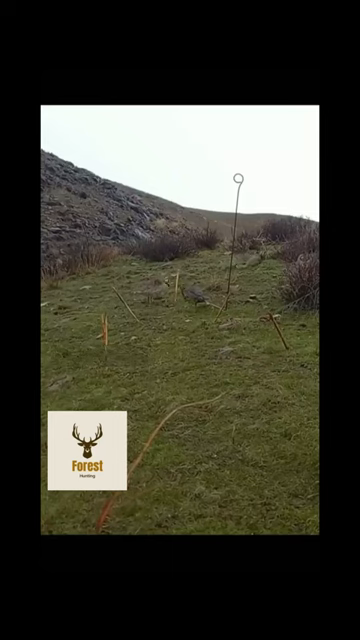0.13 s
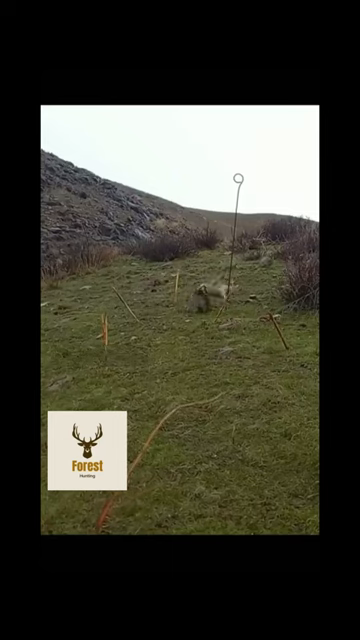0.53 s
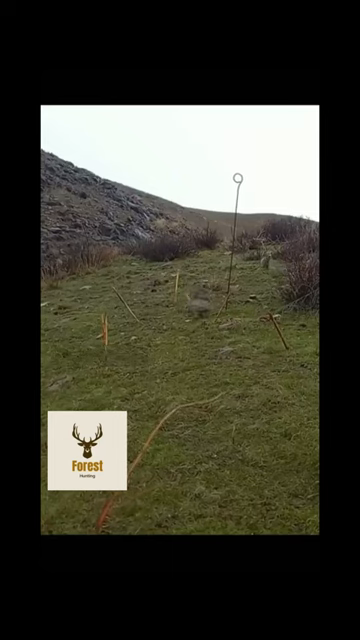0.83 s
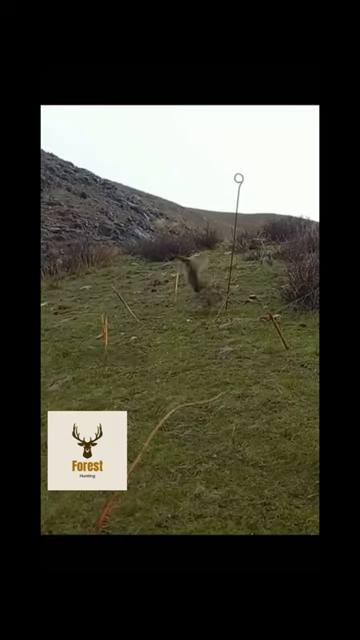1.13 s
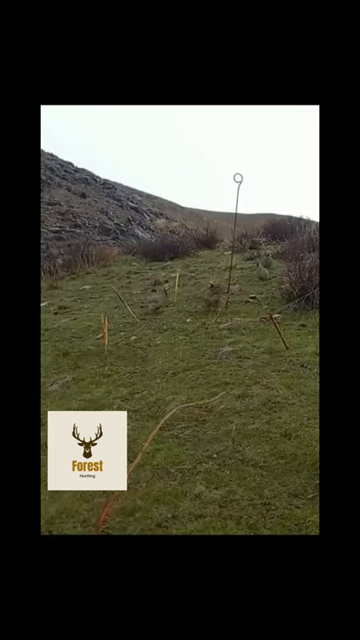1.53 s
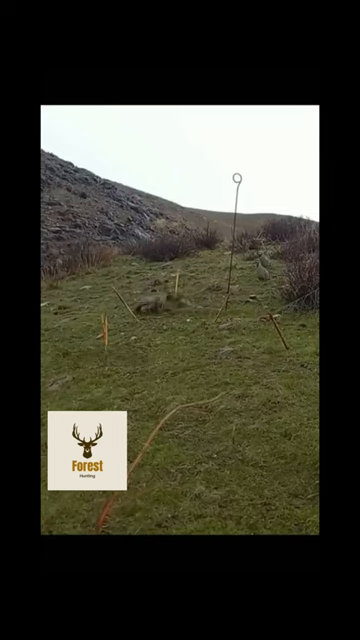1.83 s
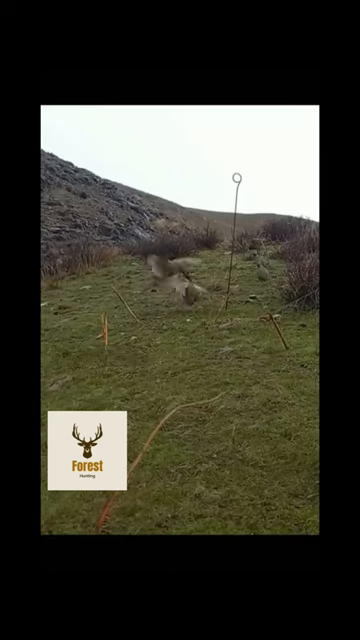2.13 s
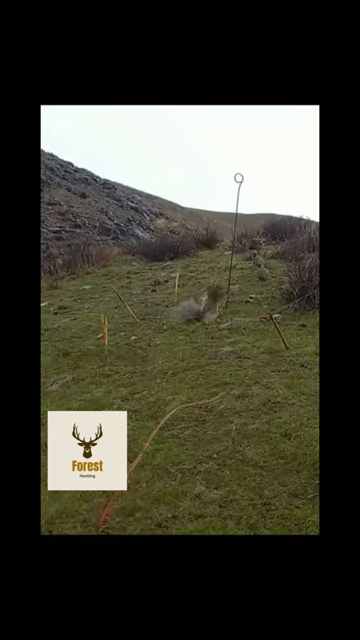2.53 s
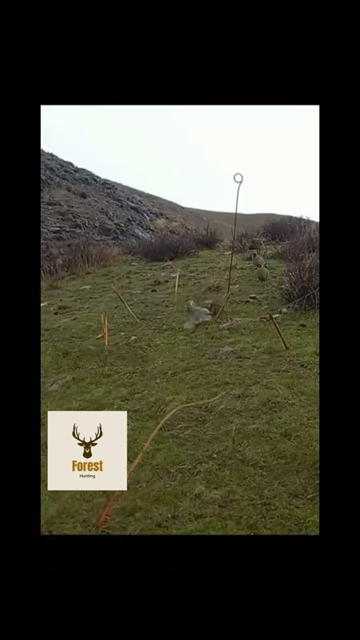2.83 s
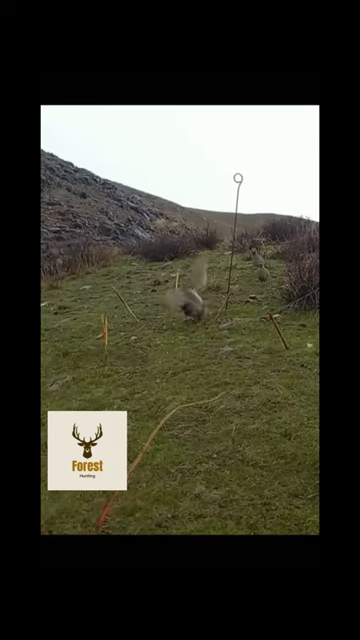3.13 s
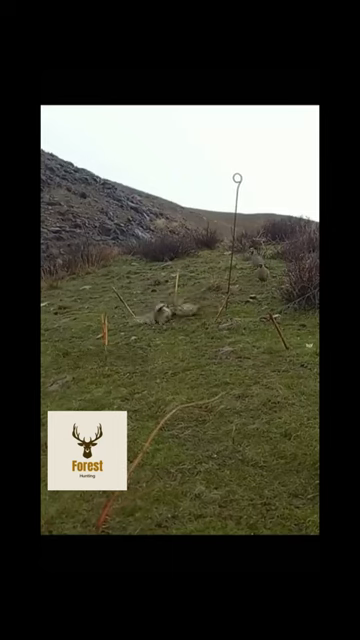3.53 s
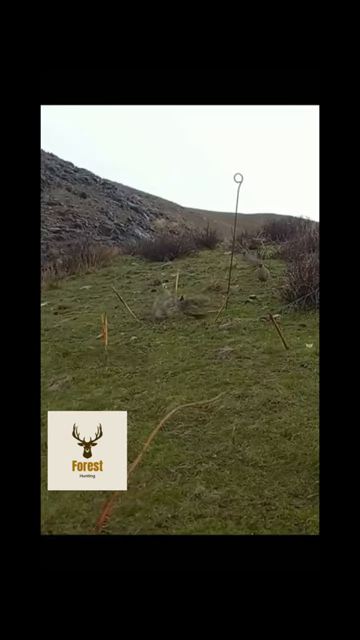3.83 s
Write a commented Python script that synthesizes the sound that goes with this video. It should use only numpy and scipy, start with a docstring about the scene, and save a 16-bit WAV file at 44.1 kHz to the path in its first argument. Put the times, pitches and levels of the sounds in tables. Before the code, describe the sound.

Fighting birds growl, hiss and squeal close by while their wings slap and feathers rustle.

```python
"""On a grassy hillside, two partridges fight close by, after a moment of silence. They growl and hiss, and
their hoarse calls break upward into thin squeals. A growl is a train of uneven pulses ringing in the throat and
mouth; a hiss is air forced through the beak. Three times they clash, once only briefly, in a flurry of wing
blows and rustling feathers. Moving air rumbles on the microphone, and the quiet field murmurs behind it all."""
import sys
import numpy as np
from scipy import signal
from scipy.fft import rfft, irfft
from scipy.io import wavfile
from scipy.ndimage import uniform_filter1d

SR = 44100
rng = np.random.default_rng(int(sys.argv[2]) if len(sys.argv) > 2 else 0)


def bounce(signal):
    """Save signal as a 16-bit WAV file at the path given by the first command-line argument."""
    frames = np.transpose(np.atleast_2d(signal))
    limited = np.clip(frames, -1, 1)
    pcm = np.round(limited * 32767).astype(np.int16)
    wavfile.write(sys.argv[1], SR, pcm)


N = 176400  # 4 seconds

# Tone colours: how strong the lows and highs of each sound are (frequency [Hz], relative level [dB])
FIELD_COLOUR = [(700, 11), (5500, 0.5), (15000, -17)]
RUMBLE_COLOUR = [(28, -23.5), (70, 6.5), (240, -40.5)]
BUFFET_COLOUR = [(60, 0), (140, -2.5), (750, -9.5), (4000, -45)]  # air shoved by a wing
FEATHER_COLOUR = [(400, 0), (1200, -0.5), (4500, 3.5), (8000, -4), (13000, -4.5), (15500, -64)]
SLAP_COLOUR = [(300, -1.5), (1200, 7), (4000, 3), (12000, -24.5)]
HISS_COLOUR = [(2000, -13), (4500, 8.5), (8500, -23)]
BODY_COLOUR = [(330, -29), (540, -10.5), (850, -9.5), (2000, -25.5), (3300, -70)]  # the low part of the voice
TREBLE_COLOUR = [(1300, -18), (2300, 5), (4600, 4), (5800, -10.5), (8500, -35), (12000, -19.5),
                 (15000, -50)]  # the high part of the voice

# Puffs of air from the wings (time [s], level [dB])
PUFFS = [(1.867, -18.5), (2.104, -13.5), (2.43, -10.5), (3.268, -16), (3.806, -19)]
# Scuffles, one list of points each (time [s], buffeting level [dB], rustle level [dB])
SCUFFLES = [
    [(.6, -29, -34), (.68, -40, -38)],
    [(2.255, -32, -38), (2.34, -22.5, -33), (2.5, -20, -28), (2.72, -22, -36), (2.75, -38, -33)],
    [(3.37, -47, -33.5), (3.42, -19, -23), (3.63, -16.5, -29.5), (3.745, -29.5, -36.5)],
]
# Wing blows and pecks (time [s], thud level [dB], slap level [dB])
BLOWS = [(0.291, -67, -21.5), (1.307, -15, -59), (2.366, -8.5, -23), (2.391, -13.5, -15), (2.67, -5, -13.5),
         (3.491, -12.5, -14), (3.585, -13.5, -12)]
# Feather snaps (time [s], level [dB])
SNAPS = [(2.534, -24.5), (2.602, -23), (3.409, -14.5), (3.476, -25), (3.55, -37), (3.735, -23.5)]
# Hoarse hisses (time [s], length [s], level [dB])
HISSES = [(0.146, 0.17, -28.5), (0.881, 0.14, -36), (1.275, 0.18, -33.5), (1.654, 0.21, -26.5),
          (1.984, 0.062, -30.5), (2.045, 0.2, -29), (3.914, 0.078, -28.5)]
# Squeals, one list of points each (time [s], pitch [Hz])
SQUEALS = [
    [(2.058, 2460), (2.077, 3085), (2.081, 4910), (2.09, 2440), (2.103, 3120)],
    [(2.44, 3000), (2.443, 5000), (2.449, 5050), (2.454, 2670), (2.466, 3190), (2.469, 4960), (2.475, 4990),
     (2.479, 2540)],
    [(2.833, 2695), (2.848, 3110), (2.851, 4810), (2.879, 5070), (2.889, 4620), (2.894, 2650),
     (2.908, 2960)],
    [(3.212, 2845), (3.227, 3265), (3.231, 4946), (3.269, 5085), (3.281, 4550), (3.293, 5060), (3.3, 2650)],
    [(3.639, 4834), (3.644, 3033), (3.659, 2864), (3.662, 5020), (3.668, 4750), (3.672, 2600)],
]
# How loud each squeal is at its top pitch (level [dB])
SQUEAL_LEVELS = [-20, -15.5, -15, -13, -11]
# Hoarse calls, one list of points each
# (time [s], pitch before any jump to a shriek [Hz], level [dB], treble over body [dB], roughness [0-1])
GROWLS = [
    [(0.153, 629, -26, -5.5, 0.25), (0.172, 599, -27, -20, 0.55), (0.212, 872, -28, -13, 0.43),
     (0.248, 815, -17, -3.5, 0), (0.272, 795, -18, -0.5, 0.25)],
    [(0.375, 471, -42, -35, 0.36), (0.396, 565, -21.5, -46, 0.26)],
    [(0.462, 749, -36.5, -12, 0.33), (0.515, 791, -23.5, 4, 0.47), (0.547, 494, -22.5, -11.5, 0.54)],
    [(0.603, 610, -33.5, -26, 0.42), (0.625, 465, -32, -19, 0.7)],
    [(0.695, 608, -35, -11, 0.32), (0.722, 582, -17, -0.5, 0.17), (0.731, 1659, -11, 14, 0.36),
     (0.746, 2117, -10, 12.5, 0.43), (0.766, 598, -16, 3.5, 0.93), (0.792, 408, -26.5, -4, 0.26)],
    [(0.917, 853.5, -37, -17, 0.39), (0.968, 1029, -20.5, 89, 0.02), (1.01, 1048, -35, 2, 0.48),
     (1.064, 539, -20, -12, 0.51)],
    [(1.15, 617, -30, 0, 0.29), (1.178, 1376, -18, 10, 0.38), (1.197, 1947, -8.5, 9.5, 0.36),
     (1.21, 679, -17, 17, 0.78), (1.232, 580, -26.5, -0.5, 0.03)],
    [(1.322, 394, -27.5, -31, 0.15), (1.342, 441, -19, -37, 0.6)],
    [(1.418, 698, -32.5, 1.5, 0.5), (1.492, 560, -22, -4.5, 0.68), (1.512, 1660, -14, 3, 0.18),
     (1.54, 2318, -12.5, 12.5, 0.57), (1.556, 726, -25.5, 9, 0.52), (1.589, 608, -24, -1.5, 0.3)],
    [(1.73, 686, -26.5, -4, 0.82), (1.812, 671.4, -21, -6.5, 0.13), (1.84, 711, -17.5, -0.5, 0.25)],
    [(2.115, 663.3, -22.5, 9, 0.9), (2.15, 473, -21, -10, 0.7)],
    [(2.433, 1856, -15, 4.5, 0.57), (2.485, 896, -14.5, 9, 0.57), (2.506, 783, -18, -5.5, 0.03)],
    [(2.912, 820, -20.5, 17, 0.75), (2.936, 646, -24, 0, 0.28)],
    [(3.05, 603, -37.5, 13.5, 0.2), (3.1, 633, -27.5, -7, 0.24)],
    [(3.3, 983, -21.5, 5, 0.63), (3.323, 590, -22.5, 0, 0.39)],
    [(3.617, 893, -20, 0, 0.49), (3.633, 1821, -13, 17, 0.49), (3.674, 1320, -14.5, 17, 0.5),
     (3.704, 675, -19.5, -5.5, 0.34)],
]

SILENCE_S, TOP_HZ = .15, 15900  # the opening silence; the upper edge of the sound


def amp(db):
    """Turns decibels into a number to multiply a sound by."""
    return 10 ** (np.asarray(db) / 20)


def unit(x):
    """Scales a sound so its average strength (rms) is 1."""
    return x / np.sqrt(np.mean(x ** 2) + 1e-20)


def steady(x):
    """Evens out the level over about a hundredth of a second."""
    return x / np.sqrt(abs(uniform_filter1d(x * x, size=500)) + 1e-12)


def colour(x, points):
    """Filters a sound to give it a tone colour."""
    hz, db = np.transpose(points)
    grid_hz = np.fft.rfftfreq(8192, 1 / SR)
    log_gain = np.interp(np.log(grid_hz + 1), np.log(hz), db) * np.log(10) / 20
    cepstrum = irfft(log_gain)
    cepstrum[1:4096] *= 2  # folded so the filter rings after a sound, never before it
    cepstrum[4097:] = 0
    ring = irfft(np.exp(rfft(cepstrum)))
    return signal.fftconvolve(x, ring)[:len(x)]


def noise(n, points):
    """Makes n samples of noise with a tone colour."""
    return colour(rng.standard_normal(n), points)


def wander(n, hz):
    """A smooth random wobble of strength 1, moving at rates up to about hz."""
    padded = n + SR // 4
    rolloff = 1 + (np.fft.rfftfreq(padded, 1 / SR) / hz) ** 4
    return unit(irfft(rfft(rng.standard_normal(padded)) / rolloff))[:n]


def swell(t, peak_s):
    """Rises to 1 at peak_s, then dies away."""
    return t / peak_s * np.exp(1 - t / peak_s)


def gesture(rows, attack_s=.012, release_s=.0058):
    """Joins points into a start time, a fade in and out, and one curve for each column after time."""
    times, *columns = np.transpose(sorted(rows))
    t = np.arange(times[0] - attack_s, times[-1] + release_s, 1 / SR)
    fade = np.interp(t, [t[0], times[0], times[-1], t[-1]], [0, 1, 1, 0])
    return t[0], fade, [np.interp(t, times, column) for column in columns]


def track(source, table):
    """Plays every row of a table and mixes each sound in at its start time."""
    mix = np.zeros(N)
    for row in table:
        start, sound = source(*row)
        part = mix[max(round(start * SR), 0):][:len(sound)]
        part += sound[:len(part)]
    return mix


def field(db=-43, waver_db=3):
    """The quiet field: a soft rush whose level wavers."""
    return amp(db) * unit(noise(N, FIELD_COLOUR) * amp(waver_db * wander(N, 9)))


def rumble(db=-36):
    """Air rumbles low on the microphone."""
    return amp(db) * unit(noise(N, RUMBLE_COLOUR))


def puff(start, db, pitch_hz=69.4):
    """Air from a wing reaches the microphone as a soft, low thump."""
    t = np.arange(0, .25, 1 / SR)
    phase = 2 * np.pi * np.cumsum(pitch_hz * (1 + .353 * wander(len(t), 61))) / SR
    return start, amp(db) * np.sin(phase) * swell(t, peak_s=.025)


def scuffle(rows, stroke_db=4.5, crackle_db=4.5):
    """Wings buffet the air in lumps while feathers rustle and grass crackles."""
    start, fade, (buffet_db, rustle_db) = gesture(rows)
    n = len(fade)
    strokes = amp(stroke_db * wander(n, 45))
    crackle = rng.standard_normal(n) * amp(crackle_db * wander(n, 1100))
    rustle = colour(crackle * strokes, FEATHER_COLOUR)
    buffet = colour(rng.standard_normal(n) * strokes, BUFFET_COLOUR)
    return start, fade * (amp(buffet_db) * unit(buffet) + amp(rustle_db) * unit(rustle))


def blow(start, thud_db, slap_db):
    """A wing strikes: a dull push of air and a short slap."""
    t = np.arange(0, .04, 1 / SR)
    thud = unit(noise(len(t), BUFFET_COLOUR)) * swell(t, peak_s=.0026)
    slap = steady(noise(len(t), SLAP_COLOUR)) * swell(t, peak_s=.0019)
    return start, amp(thud_db) * thud + amp(slap_db) * slap


def snap(start, db, decay_s=.006):
    """Stiff feathers flick past each other: a sudden, bright burst."""
    t = np.arange(0, 10 * decay_s, 1 / SR)
    return start, amp(db) * unit(noise(len(t), FEATHER_COLOUR)) * np.exp(-t / decay_s)


def hiss(start, length, db, whistle_hz=(3890, 5140)):
    """Air forced through the beak, with two wandering whistles in it."""
    n = int(length * SR)
    whistles = np.zeros(n)
    for hz in whistle_hz:
        phase = 2 * np.pi * np.cumsum(hz * (1 + .16 * wander(n, 57.6))) / SR
        whistles += np.sin(phase) * wander(n, 126)
    air = unit(noise(n, HISS_COLOUR)) + .96 * unit(whistles)
    fade = np.sin(np.pi * np.arange(n) / n) ** .69
    return start, amp(db) * unit(air) * fade


def squeal_gesture(rows):
    """The start time, very quick fades and pitch curve of one squeal."""
    return gesture(rows, attack_s=.003, release_s=.003)


def squeal(rows, db, waver=.016, rasp=.28, overtone_db=-14, breath_db=-17):
    """A raspy tone that jumps between two pitch ranges; the low one is weaker and has an overtone."""
    start, fade, (hz,) = squeal_gesture(rows)
    n = len(hz)
    phase = 2 * np.pi * np.cumsum(hz * (1 + waver * wander(n, 530))) / SR
    lowness = np.clip((3700 - hz) / 700, 0, 1)
    tone = np.sin(phase) + amp(overtone_db) * lowness * np.sin(2 * phase)
    flutter = 1 + rasp * (wander(n, 90) + .5 * wander(n, 900))
    tone *= np.sqrt(2) * (hz / hz.max()) * flutter
    breath = amp(breath_db) * unit(noise(n, TREBLE_COLOUR))
    build_up = np.minimum(np.linspace(.35, 2, n), 1)
    return start, fade * amp(db) * (tone + breath) * build_up


def throat(x, ring_s=.001):
    """A brief ringing in the throat that shifts from one random colour to another during a call."""
    t = np.arange(0, 10 * ring_s, 1 / SR)
    angle = np.linspace(0, np.pi, len(x))
    ringing = np.zeros(len(x))
    for blend in (np.cos(angle), np.sin(angle)):
        ring = rng.standard_normal(len(t)) * np.exp(-t / ring_s)
        ringing += blend * signal.fftconvolve(x, ring)[:len(x)]
    return ringing


def mouth(x, pitch_hz, highest_hz=2150):
    """The mouth opens and closes with the pitch, ringing at nearly twice that pitch, up to a limit."""
    ring_hz = np.minimum(1.95 * pitch_hz, highest_hz)
    spin = np.exp(2j * np.pi * np.cumsum(ring_hz) / SR)
    decay = np.exp(-np.pi * 1200 / SR)
    # Slide ring_hz down to zero, smooth twice, then slide back: only a band around it is left.
    smoothed = signal.lfilter([1 - decay], [1, -2 * decay, decay ** 2], x / spin)
    return (spin * smoothed).real


def growl(rows, crack=.24, jitter=.1533, shimmer=.32):
    """Unsteady pulses and puffs of breath make the throat and the moving mouth ring."""
    start, fade, (hz, db, treble_db, rough) = gesture(rows)
    n = len(hz)
    cracks = crack * rough * np.sign(wander(n, 130))  # the voice cracks up and down
    held_hz = np.select([hz > 2000, hz > 1217], [2600, 1672], hz)  # a pushed voice jumps to a shriek
    wobble = jitter * rough * wander(n, 393)
    phase = 2 * np.pi * np.cumsum(held_hz * (1 + wobble + cracks)) / SR
    pulses = unit(sum(np.cos(k * phase) * (k * hz < TOP_HZ) for k in range(1, 24)))
    pulses = steady(pulses) * (1 + shimmer * rough * wander(n, 500))
    breath = rough * unit((1 + np.cos(phase)) * rng.standard_normal(n))  # one puff with each pulse
    buzz = pulses + breath
    body = steady(colour(buzz, BODY_COLOUR))
    body = steady(body + 1.2 * steady(mouth(body, hz)))
    treble = steady(colour(throat(buzz), TREBLE_COLOUR))
    voice = (body + amp(treble_db) * treble) / np.sqrt(1 + amp(treble_db) ** 2)
    return start, fade * amp(db) * voice


def scene():
    """Mixes voices, wings, rumbling air and the field; a growl gives way while the voice squeals."""
    squealing = track(lambda rows: squeal_gesture(rows)[:2], zip(SQUEALS))  # 1 during a squeal
    growls = track(growl, zip(GROWLS)) * (1 - .55 * squealing)
    voices = growls + track(squeal, zip(SQUEALS, SQUEAL_LEVELS)) + track(hiss, HISSES)
    wings = track(scuffle, zip(SCUFFLES)) + track(blow, BLOWS) + track(snap, SNAPS)
    air = rumble() + track(puff, PUFFS)
    return (field() + air + wings + voices)[None]


def record(dry):
    """Clips the loudest peaks, silences the first moment and cuts off the very highest sounds."""
    clipped = np.clip(dry, -.9, .9)
    sound_on = np.arange(N) / SR >= SILENCE_S
    low_pass = signal.firwin(511, TOP_HZ, window=("kaiser", 9), fs=SR)
    return signal.oaconvolve(clipped * sound_on, low_pass[None], "same")


dry = scene()
out = record(dry)
bounce(out)
```